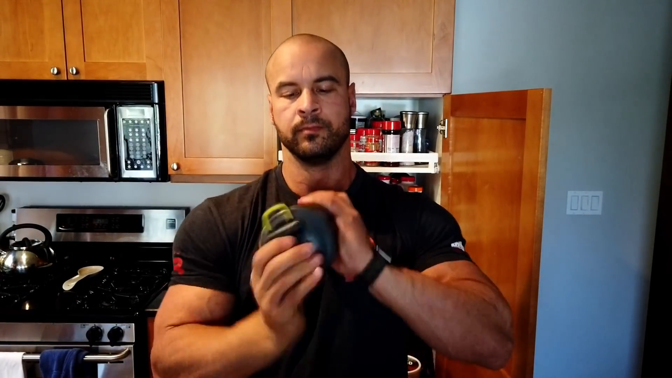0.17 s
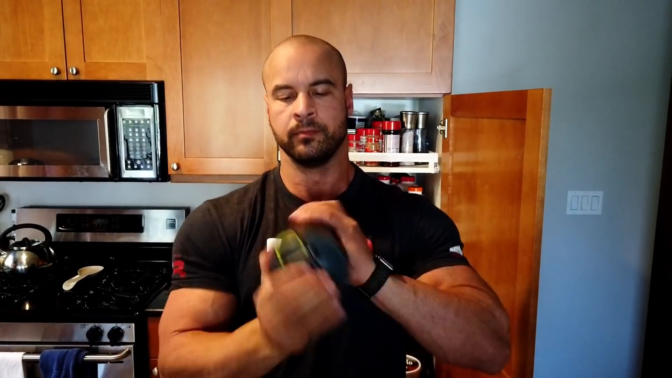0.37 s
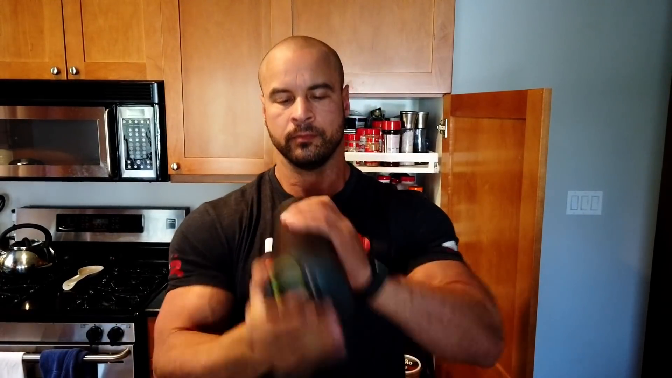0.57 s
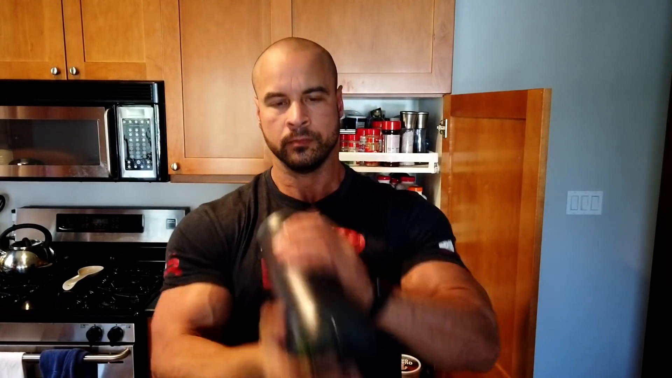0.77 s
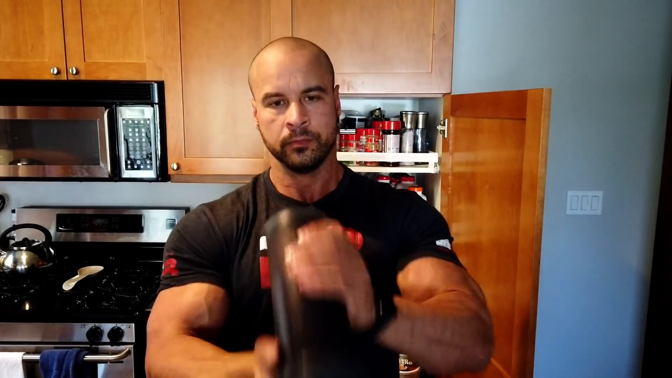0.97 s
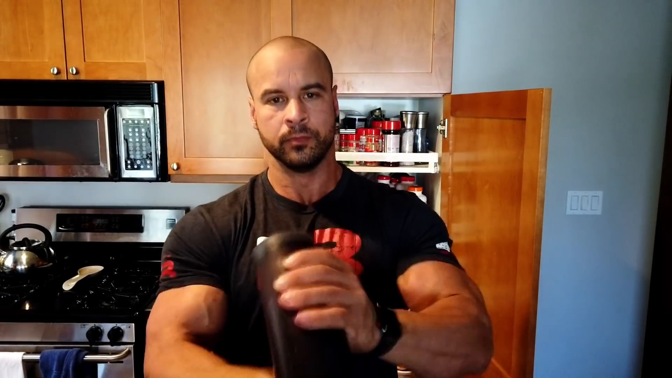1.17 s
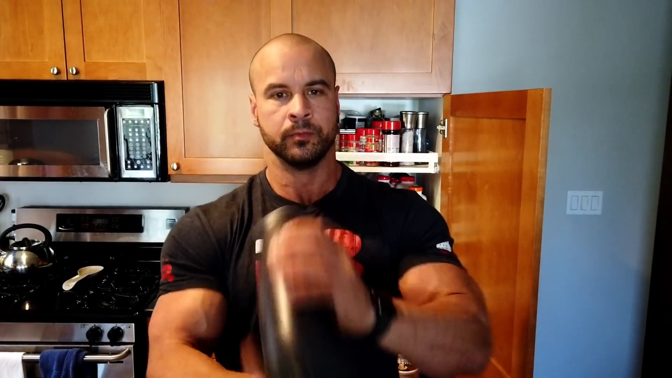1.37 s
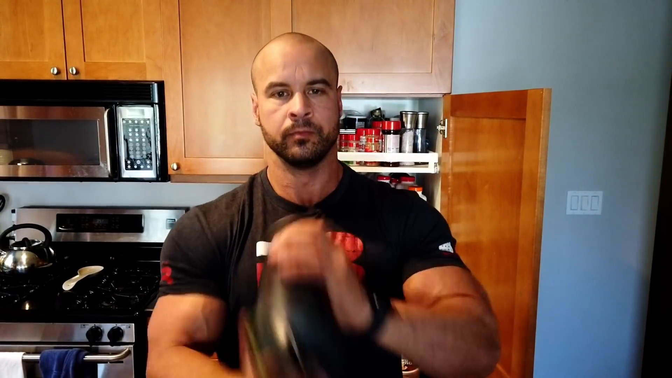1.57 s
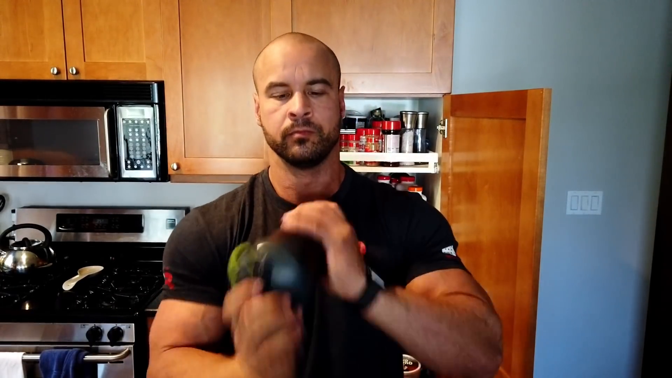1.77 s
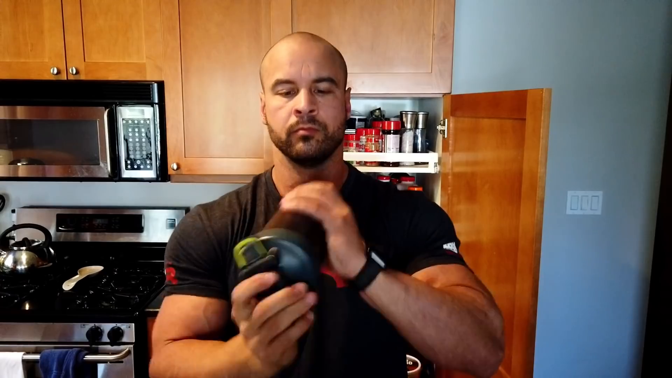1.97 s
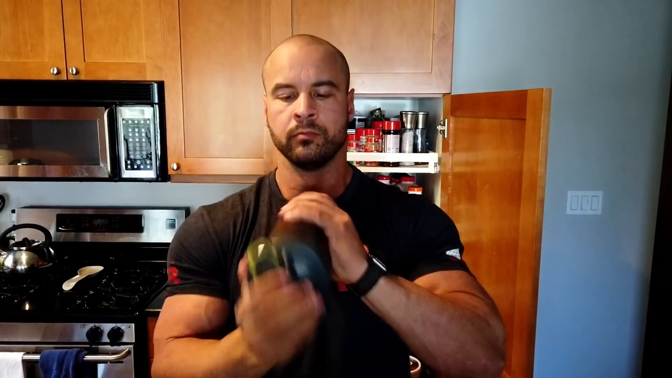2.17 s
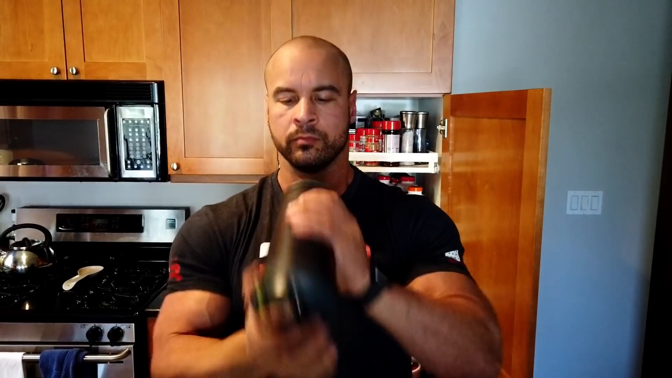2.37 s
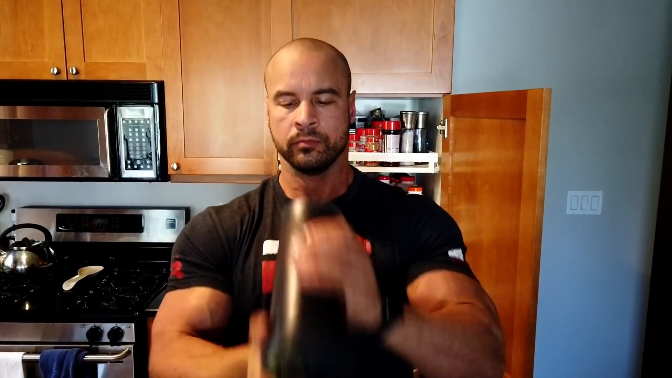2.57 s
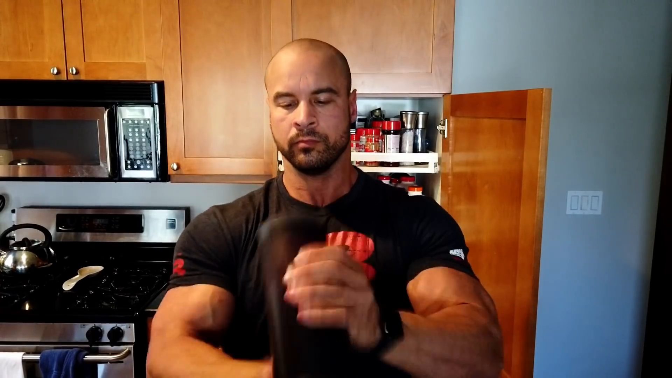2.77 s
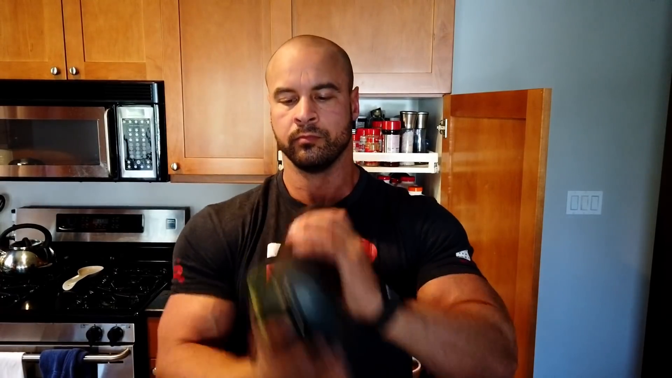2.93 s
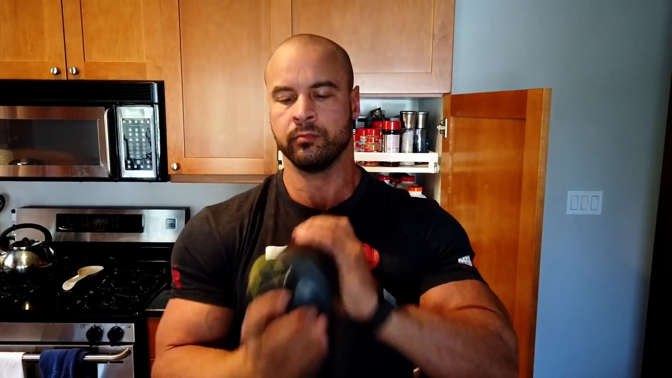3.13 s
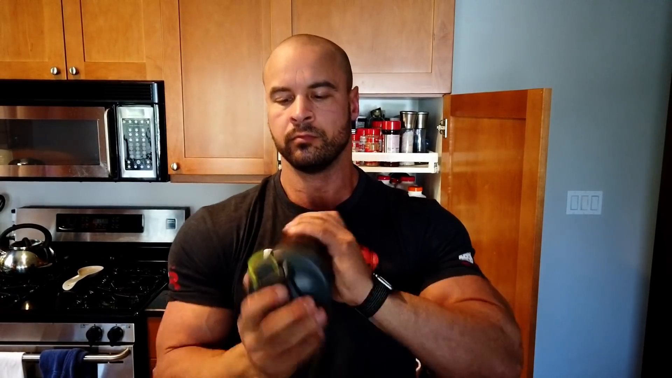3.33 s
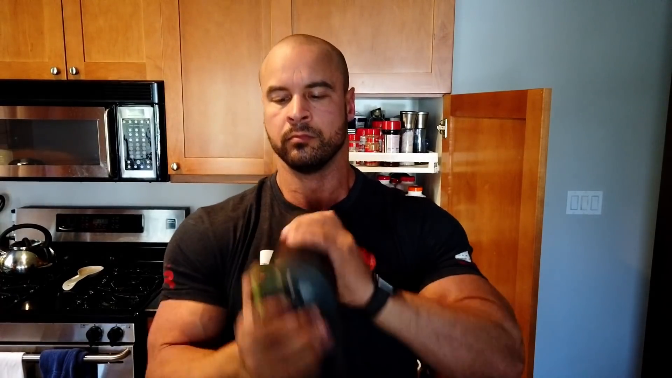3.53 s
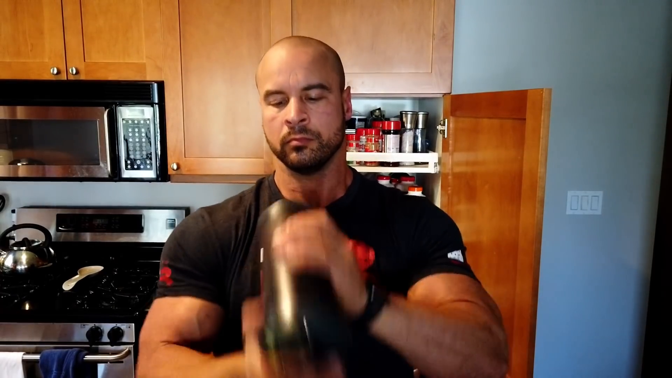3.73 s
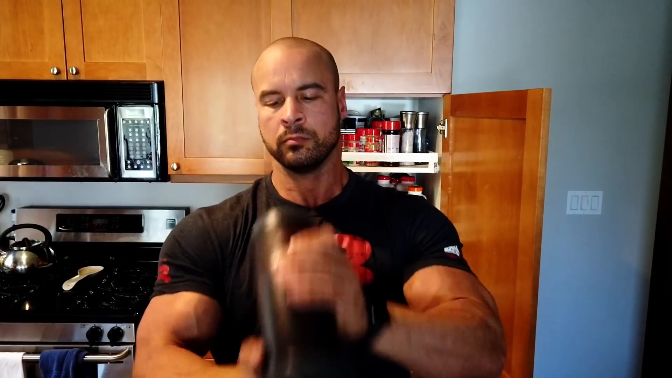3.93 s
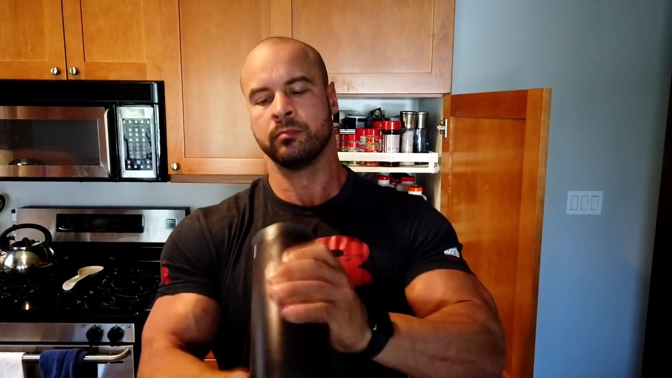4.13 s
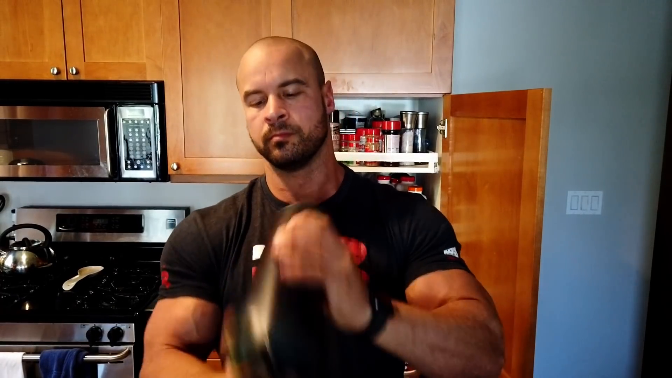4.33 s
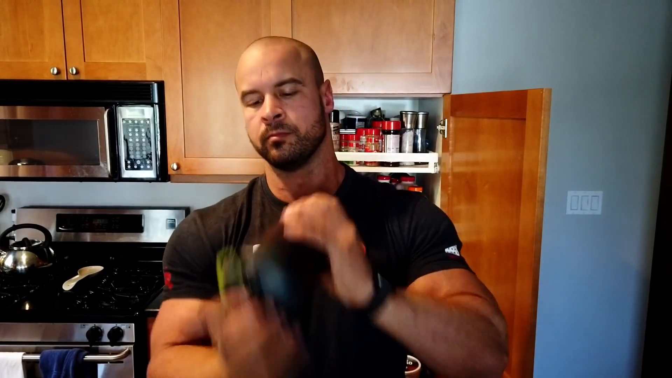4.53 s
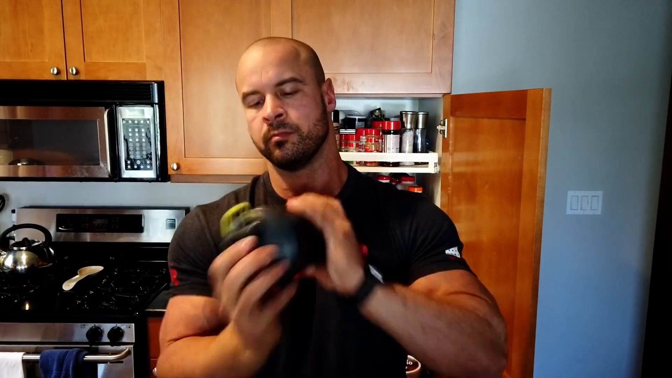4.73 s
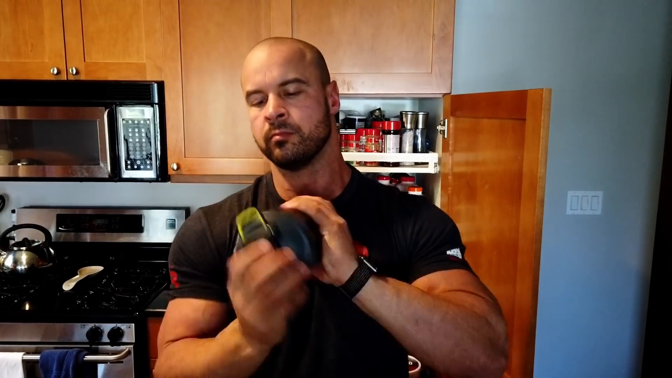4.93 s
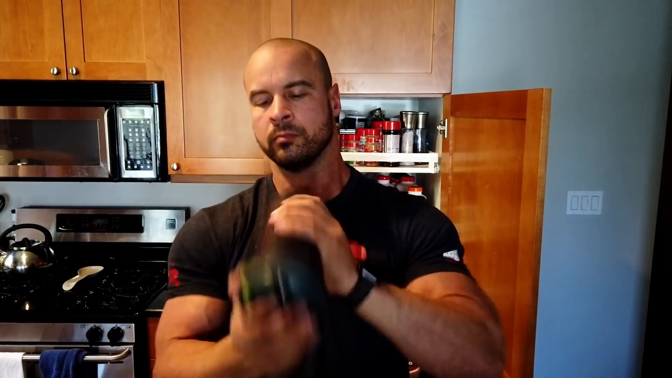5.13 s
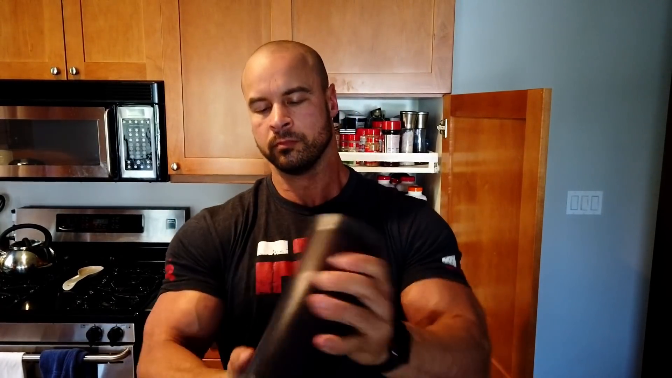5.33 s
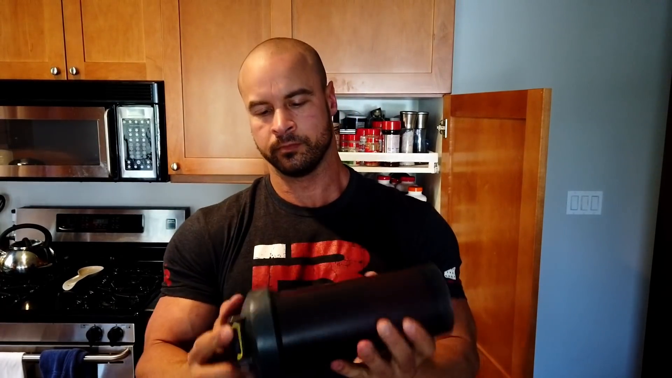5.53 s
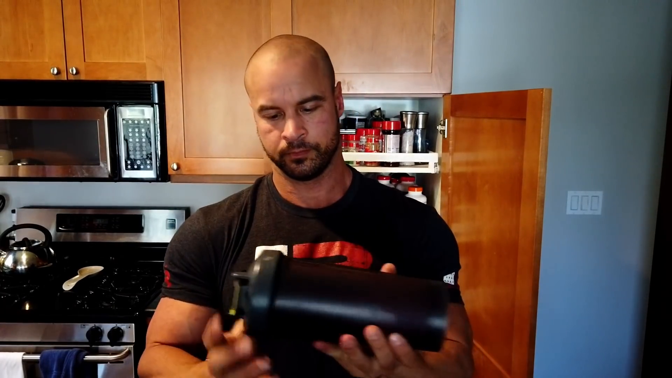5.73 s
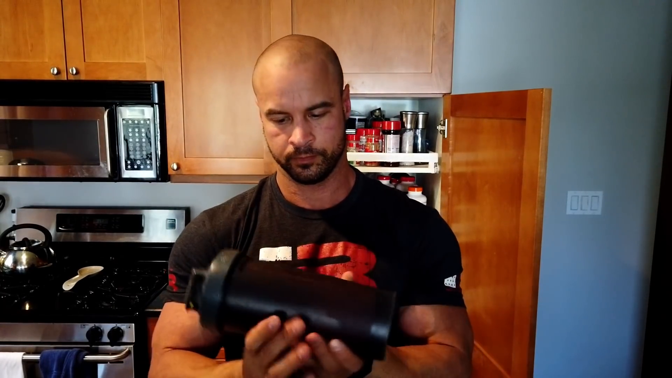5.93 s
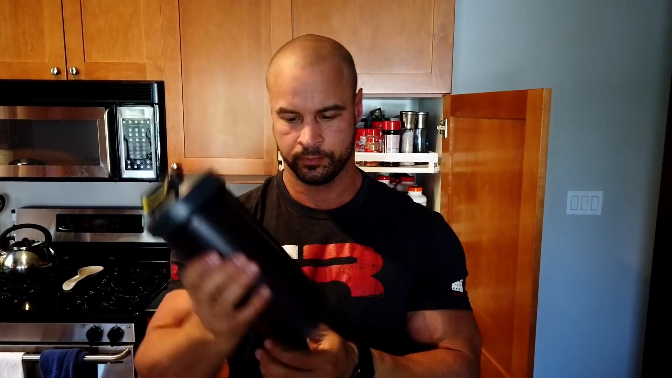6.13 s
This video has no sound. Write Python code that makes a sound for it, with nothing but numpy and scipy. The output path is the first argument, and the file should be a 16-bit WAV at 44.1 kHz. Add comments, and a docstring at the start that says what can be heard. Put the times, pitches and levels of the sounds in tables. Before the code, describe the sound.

A plastic shaker bottle shaken hard in a kitchen, loose mixer rattling and drink sloshing, then stopping and settling over a faint hum.

```python
"""A plastic shaker bottle is shaken hard, a step away in a kitchen: a loose mixer knocks on its wall.
Each knock rings the bottle's modes and snaps in the treble; the drink slaps, sloshes, bubbles and gurgles as shaped noise.
Two hollow resonances swell once per stroke, and a few blows of the drink's mass thump low.
Random echoes make the kitchen. The shaking stops and the drink settles.
A refrigerator hums as a wavering tone over the quiet of the room, which is filtered noise."""
import sys
import numpy as np
from scipy import signal
from scipy.fft import rfft, irfft, next_fast_len
from scipy.io import wavfile
from scipy.ndimage import uniform_filter1d, map_coordinates

SR = 44100
rng = np.random.default_rng(int(sys.argv[2]) if len(sys.argv) > 2 else 0)


def wav_record(signal):
    """Record a signal, one row per channel, as 16-bit PCM in the file named by sys.argv[1]."""
    frames = np.transpose(np.atleast_2d(signal))
    bounded = np.clip(frames, -1, 1)
    # unit amplitude maps onto the largest positive 16-bit level
    quanta = np.round(bounded * 32767).astype(np.int16)
    wavfile.write(sys.argv[1], SR, quanta)


N = 273271


def amp(db):
    """Decibels become a plain factor."""
    return 10 ** (np.asarray(db) / 20)


def unit(x):
    """Scale a sound to an rms of 1."""
    return x / np.sqrt(np.mean(x ** 2) + 1e-20)


def along(points, hz):
    """Read a table of (f/Hz, value) on a log frequency axis."""
    f, value = np.transpose(points)
    return np.interp(np.log(hz + 1), np.log(f + 1), value)


def wobble(rate):
    """A smooth random curve with this many random points a second."""
    points = rng.standard_normal(int(N * rate / SR) + 4)
    return map_coordinates(points, [np.arange(N) * rate / SR])


def filtered(x, response):
    """Weigh every frequency of a sound by a response."""
    m = next_fast_len(N + SR // 5)
    spectrum = rfft(x, m) * response(np.fft.rfftfreq(m, 1 / SR))
    return irfft(spectrum, m)[..., :N]


def ports(mid, side, alike):
    """Mix two unrelated signals to a left and right as alike as the table says."""
    def shares(hz):
        turn = np.arccos(np.clip(along(alike, hz), -1, 1)) / 2
        return np.array([np.cos(turn), np.sin(turn)])
    mid, side = filtered(np.array([mid, side]), shares)
    return np.array([mid + side, mid - side])


def swells(s, db, rise_s, t60_s):
    """Summed power of swells that rise quickly and die away."""
    step = 64  # samples; the power is worked out coarsely, then joined up
    t = np.maximum(np.arange(0, N + 2 * step, step) / SR - s[:, None], 0)
    shape = np.exp(-np.log(1000) * t / t60_s) * (1 - np.exp(-t / rise_s))
    power = amp(db) ** 2 @ shape ** 2
    return np.interp(np.arange(N), step * np.arange(len(power)), power)


# colour of the room noise: f/Hz, relative level per Hz/dB
ROOM_COLOUR = [(13, -52), (22, -2.5), (44, -13.5), (85, -19), (152, -19), (230, -29), (540, -26.5),
               (771, -29), (2670, -36.5), (6620, -48), (12500, -48), (13500, -54), (17000, -73.5)]
# how alike left and right are in the room noise: f/Hz, likeness (1 = the same)
ROOM_ALIKE = [(60, 0.95), (240, 0.99), (950, 0.59), (3770, 0.38), (15000, 0.11)]


def quiet():
    """The room's rumble and hiss: wide noise whose level drifts a little."""
    noise = rng.standard_normal((2, N))
    mid, side = filtered(noise, lambda hz: amp(along(ROOM_COLOUR, hz)))
    drift_db = 1.8 * wobble(11) + 1.1 * wobble(4)
    return amp(-68.5 + drift_db) * unit(ports(mid, side, ROOM_ALIKE))


def refrigerator():
    """A hum at twice the mains frequency, wavering in phase and level."""
    hum_hz, hum_db = 120, -70.5  # rms level before the waver
    phase = 2 * np.pi * hum_hz * np.arange(N) / SR + 0.3 * wobble(12)
    waver_db = 1.7 * wobble(12) + .9 * wobble(4)
    return np.sqrt(2) * amp(hum_db + waver_db) * np.sin(phase)


# how long the kitchen's answer lasts: f/Hz, t60/s (time to fall 60 dB)
KITCHEN_T60 = [(200, 0.46), (2000, 0.14), (10000, 0.24)]
# how alike left and right are in the kitchen's answer and the splashes: f/Hz, likeness
SPLASH_ALIKE = [(60, 0.89), (120, 1.0), (550, 1), (950, 0.94), (1650, 0.95), (2860, 0.68), (4970, 0.17),
                (8640, 0.21), (15000, 0.58)]


def kitchen(x):
    """Counters and cupboards answer within milliseconds; each frequency dies at its own speed."""
    wet, step = np.zeros((2, N + SR)), SR // 3
    # a fresh random echo tail is drawn three times a second
    for at in range(0, N, step):
        hz, t, z = signal.stft(rng.standard_normal((2, step)), SR, nperseg=256)
        fade = amp(-60 * t / along(KITCHEN_T60, hz)[:, None])
        tail = signal.istft(z * fade, SR, nperseg=256)[1]
        tail = tail / np.linalg.norm(tail[0])
        answer = signal.fftconvolve(x[None, at:at + step], tail, axes=1)
        start = at + 100  # samples of delay
        wet[:, start:start + answer.shape[1]] += answer
    return ports(*wet[:, :N], SPLASH_ALIKE)


# churning between the strokes, dying when the arms stop: t/s, relative level/dB
CHURN_LEVEL = [(0, -49), (.6, -50.5), (1.2, -53), (2.44, -53.5), (2.55, -54), (2.66, -52), (3.12, -51),
               (3.24, -53.5), (3.4, -47.5), (3.7, -45.5), (4.18, -50.5), (4.4, -47.5), (5.0, -51.5),
               (5.47, -44), (5.67, -73.5), (5.85, -100.5)]


def churning():
    """The churning's level in dB at every sample, silent after the last row."""
    s, db = np.transpose(CHURN_LEVEL)
    return np.interp(np.arange(N) / SR, s, db, right=-120)


# the drink's mass hits an end of the bottle; a faster blow is higher and shorter:
# t/s, relative level/dB, f/Hz
MASS_BLOWS = [(0.421, -42.5, 180), (1.099, -53, 70.4), (1.547, -59, 80), (2.912, -55, 71),
              (3.383, -58.5, 55), (4.054, -56, 50), (4.266, -61, 70), (5.211, -62, 80)]
# colour of the arms' rumble: f/Hz, relative level per Hz/dB
RUMBLE_COLOUR = [(15, -36.5), (28, -9.5), (47, -0.5), (75, -18), (110, -7.5), (220, -12.5), (300, -57.5)]
# strokes of the arms, also played by hollow_rings() and surge(): landing in the lid t/s, landing level/dB,
# depth level/dB (extra for the gurgle), lead t/s of leaving the base, leaving level/dB (levels relative)
ARM_STROKES = [(-0.03, -35.5, -1, 0.059, -50), (0.18, -36.5, -5, 0.067, -41),
               (0.403, -39.5, -1, 0.085, -41.5), (0.633, -40, -4.5, 0.076, -45.5),
               (0.869, -41.5, 0, 0.083, -45), (1.085, -40.5, 1, 0.086, -47.5),
               (1.322, -40, 1, 0.064, -39.5), (1.534, -38, 2, 0.092, -44), (1.751, -41.5, 4, 0.063, -41),
               (1.974, -39, 0.5, 0.074, -40.5), (2.213, -43, 6, 0.075, -44), (2.443, -44, 8.5, 0.07, -44),
               (2.667, -39.5, -8, 0.076, -43), (2.898, -41, 6.5, 0.077, -42),
               (3.133, -44.5, 12, 0.073, -44.5), (3.366, -41, 5, 0.062, -45.5), (3.589, -44, 4, 0.074, -52),
               (3.823, -39.5, -1, 0.084, -45), (4.048, -42, 9, 0.053, -46.5), (4.244, -39, -5, 0.044, -54),
               (4.512, -41, -7, 0.11, -45.5), (4.745, -42, -6, 0.092, -45), (4.961, -40.5, 1, 0.072, -44),
               (5.2, -41, 2.5, 0.089, -40)]


def thumps():
    """Soft low pushes with their recoil, over the rumble of the moving arms."""
    out, t = np.zeros(N + SR), np.arange(SR // 5) / SR
    for s, db, hz in MASS_BLOWS:
        turns = hz * t
        push = turns / 0.045 * np.exp(1 - turns / 0.13)
        out[round(s * SR):][:len(t)] += amp(db) * push * np.sin(2 * np.pi * turns)
    rumble = unit(filtered(rng.standard_normal(N), lambda hz: amp(along(RUMBLE_COLOUR, hz))))
    s = np.transpose(ARM_STROKES)[0]
    heave_db = -62.5 + rng.normal(0, 3, len(s))
    heave = swells(s - .02, heave_db, rise_s=0.01, t60_s=0.57)  # starts 20 ms before the landing
    rest = amp(churning() - 27.5) ** 2
    return out[:N] + np.sqrt(heave + rest) * rumble


def hollow_rings():
    """Noise in two resonances swells once per stroke: the higher from the landing, the lower from 0.34 s before leaving."""
    s, land_db, _, before_s, leave_db = np.transpose(ARM_STROKES)
    # f/Hz, width/Hz, level/dB over the stroke, lead t/s
    higher, lower = (2441.5, 152, -7, 0), (1790.5, 171, -3.5, 0.34)
    out = 0
    for (hz, width_hz, db, lead_s), at, level_db in ((higher, s, land_db), (lower, s - before_s, leave_db)):
        lumpy = amp(4.5 * wobble(60)) * rng.standard_normal(N)
        tone = unit(filtered(lumpy, lambda f: 1j * f * width_hz / (hz * hz - f * f + 1j * f * width_hz)))
        out = out + tone * np.sqrt(swells(at - lead_s, level_db + db, rise_s=0.02, t60_s=0.38))
    return out


def surge(stroke_db, knock_db, rest_db, swing, rise_s, t60_s, knock_t60_s, per_depth=0):
    """A layer's gain: strokes throw the drink off the base and into the lid, knocks splash it, churning fills the rest."""
    # the dB arguments are the layer's level over each cause
    s, land_db, depth_db, before_s, leave_db = np.transpose(ARM_STROKES)
    front_s = 0.0082  # the front of the drink comes this long before its mass
    starts = np.r_[s, s - before_s] - front_s
    levels = np.r_[land_db + per_depth * depth_db, leave_db] + stroke_db
    thrown = swells(starts, levels, rise_s, t60_s)
    knock_s, level_db = np.transpose(MIXER_KNOCKS + DRINK_SLAPS)[:2]
    splashed = swells(knock_s, level_db + knock_db, 0.0025, knock_t60_s)
    mean_db = -52.5  # each layer swings about this churning level
    churn_db = mean_db + swing * (churning() - mean_db)
    return np.sqrt(thrown + splashed + amp(churn_db + rest_db) ** 2)


def spatter(spectrum, per_s, scatter_db, grain_s, wash):
    """Stereo noise of rms 1, broken into splashes of uneven size over a smooth wash."""
    drops = (rng.random(N) < per_s / SR) * amp(scatter_db * rng.uniform(-0.15, 1, N))
    fade = np.exp(-np.arange(SR // 40) / (grain_s * SR))
    bursts = unit(signal.fftconvolve(drops, fade)[:N])
    z = signal.stft((bursts + wash) * rng.standard_normal((2, N)), nperseg=512)[2]
    # random patches in time and frequency give each splash its own colour
    field = uniform_filter1d(rng.standard_normal(z.shape[1:]), size=2, axis=0)
    field = uniform_filter1d(field, size=6, axis=1)
    patchy = signal.istft(z * amp(2.73 * unit(field)), nperseg=512)[1][:, :N]
    mid, side = filtered(patchy, lambda hz: amp(along(spectrum, hz)))
    return unit(ports(mid, side, SPLASH_ALIKE))


def bubbles():
    """Trapped air pops in the froth: short rising pips, a few louder, together at rms 1."""
    per_s, centre_hz, spread = 300, 2310, 0.25  # spread of the log pitch
    cycles, rise, scatter_db = 9.1, 0.12, 2.5  # rise: share of pitch gained over one life
    when, pitch, size = rng.random((3, int(per_s * N / SR), 1))
    start = (when * N).astype(int)
    hz = np.clip(centre_hz * np.exp(spread * np.log(pitch / (1 - pitch)) / 2), 1100, 6000)
    froth = np.exp(.17 * wobble(11))  # coarse and fine froth come and go
    hz = hz * froth[start]
    k = np.arange(SR // 90)
    life = hz * k / SR / cycles
    pip = np.sin(2 * np.pi * cycles * life * (1 + rise * life / 2)) * life * np.exp(-4 * life)
    pip = pip * amp(-scatter_db * np.log(np.maximum(size, .03)))
    pops = np.bincount((start + k).ravel(), pip.ravel())[:N]
    return unit(np.pad(pops, (0, N - len(pops))))


# colours of slaps on the wall, fine spray and low gurgles: f/Hz, relative level per Hz/dB
SLOSH_COLOUR = [(470, -17.5), (800, -6), (1110, -0.5), (1380, 4.5), (1520, 1), (1800, 4), (2560, 5.5),
                (6000, -8), (7800, -46), (13200, -120)]
SPRAY_COLOUR = [(2060, -24.5), (3500, -4), (4630, -9), (7660, -8), (9140, -12.5), (10100, -9.5),
                (11200, -11), (15200, -21), (15900, -50)]  # also colours the snap of a knock
GURGLE_COLOUR = [(120, -40.5), (200, -14.5), (264, -20.5), (314, -5.5), (446, -7), (567, -3.5), (715, -4.5),
                 (1200, -8), (1560, -27.5), (2640, -120)]


def drink():
    """Three sizes of splash: sloshing, fine spray and low gurgles; bubbles swell with the slosh."""
    slosh = surge(stroke_db=-1.5, knock_db=-22.5, rest_db=-1.0, swing=0.67,
                  rise_s=0.01, t60_s=0.45, knock_t60_s=0.096)
    spray = surge(stroke_db=-5.5, knock_db=-35.5, rest_db=-10.5, swing=0.92,
                  rise_s=0.0086, t60_s=0.5, knock_t60_s=0.2)
    gurgle = surge(stroke_db=-4.5, knock_db=-30.0, rest_db=-10.5, swing=0.77,
                   rise_s=0.017, t60_s=0.29, knock_t60_s=0.049, per_depth=0.65)
    return (slosh * spatter(SLOSH_COLOUR, per_s=510, scatter_db=5, grain_s=0.0035, wash=0.8)
            + slosh * amp(-2.5) * bubbles()
            + spray * spatter(SPRAY_COLOUR, per_s=260, scatter_db=9, grain_s=0.0015, wash=2.2)
            + gurgle * spatter(GURGLE_COLOUR, per_s=200, scatter_db=-8.0, grain_s=0.0022, wash=6.3))


def ring(modes, t, weight_db=0):
    """Modes set ringing at new strengths, detuned by the drink that loads the wall."""
    hz, db, t60 = np.transpose(modes)[:, :, None]
    level = db + weight_db + rng.normal(0, 2.5, hz.shape)
    hz = hz * (1 + rng.normal(0, .025, hz.shape))
    phase = rng.normal(0, .9, hz.shape)
    return np.sum(amp(level - 60 * t / t60) * np.sin(2 * np.pi * hz * t + phase), axis=0)


# knocks of the mixer on the wall: t/s, relative level/dB, ring centre f/Hz,
# snap level/dB, snap brightness level/dB (treble over the rest), body level/dB
MIXER_KNOCKS = [(0.1842, -27.5, 2020, -8, 3, -25), (0.242, -19, 1910, -9, 0.5, -42),
                (0.3176, -27.5, 1570, -16.5, -6, -18), (0.4041, -16.5, 3200, -17, 9, -8),
                (0.4552, -16.5, 1810, -14, -4, -38), (0.5724, -31.5, 1710, -23, -2, 6),
                (0.6338, -22, 2350, -9.5, -1.5, -29), (0.694, -16, 2200, -14.5, -8.5, -39.5),
                (.7802, -32.5, 2690, -13.5, 10.5, 3.5), (0.811, -30, 1400, -28, -4.5, -16),
                (0.862, -26, 2500, -19, -1, -30), (0.869, -21, 2520, -14.5, 6, -38),
                (.9125, -30, 2020, -19, -6, -25), (.9699, -28.5, 2700, -16, 4, -27),
                (0.9986, -30.5, 2570, -11, 4, -23), (1.145, -33.5, 2040, -10, 0, 7),
                (1.2266, -27, 2010, -11, -4, -20), (1.2648, -16, 3120, -31, -1, -30),
                (1.3214, -19, 3030, -11, 1, -36), (1.3513, -11.5, 2000, -17.5, 4, -47),
                (1.424, -23.5, 3020, -13.5, 1, -31), (1.464, -29, 2640, -17, 4, -25),
                (1.5326, -25, 2380, -10.5, 10, -23), (1.5545, -34.5, 2400, -4.5, 11, -25),
                (1.5991, -31.5, 1940, -4, 0.5, -27), (1.709, -23.5, 1510, -24.5, -10, -12),
                (1.7532, -16, 2800, -16, 6, -28), (1.813, -16.5, 1890, -14.5, -6, -41),
                (1.8265, -23, 2400, -12.5, -6, -30), (1.8764, -27, 2400, -14, 1, -24),
                (1.9017, -39, 2420, -6, 2, -14), (1.9698, -29, 2400, -6, -4, -36),
                (1.9884, -22, 2420, -24, 2, -32), (2.037, -28, 2160, -9, -1.5, -39),
                (2.116, -35.5, 1770, -1, 9, -34), (2.158, -26, 1950, -24, -18, -4),
                (2.1982, -27, 2500, -20, -5, -27), (2.216, -20.5, 2300, -20.5, -4, -7),
                (2.2735, -19.5, 2470, -37, 1.5, -37), (2.401, -25, 1270, -25, 0, -1.5),
                (2.514, -33, 2010, -28, -4, -19), (2.571, -32, 2900, -18, -5, -24),
                (2.6147, -26, 1840, -17, 8, -7), (2.6714, -20.5, 2460, -33, -8, -15.5),
                (2.7103, -39, 2400, -9, 1, -24.5), (2.724, -36, 3200, -7, 2, -25),
                (2.7333, -12.5, 2470, -15.5, 12, -21), (2.7754, -24, 2300, -17, 5, -27),
                (2.803, -30.5, 2200, -7, 4.5, -27), (2.8282, -29.5, 1800, -11, 8, -27),
                (2.844, -23.5, 2000, -21, -5.5, -23), (2.9013, -22.5, 2950, -18, -3.5, -28),
                (2.9715, -21, 3360, -17, 1.5, -32), (3.0121, -29, 2670, -11.5, -3, -31),
                (3.048, -30.5, 2470, -9.5, -9, -29), (3.0704, -23, 2360, -18, 5, -10),
                (3.133, -24, 2600, -23, -7, -30), (3.1364, -13.5, 2870, -18.5, 0, -16.5),
                (3.3704, -17.5, 2560, -14, 1.5, -3), (3.4314, -14, 3060, -19, -10, -25),
                (3.4936, -30.5, 2400, -16, 7, -25), (3.522, -36, 2400, -8.5, 7, -25),
                (3.6658, -25, 2430, -33, -7, -7), (3.697, -24.5, 2320, -19, -4, -28),
                (3.707, -22, 2270, -15.5, 10, -26), (3.735, -37, 2300, -12, 11, -28),
                (3.8291, -16.5, 2870, -15, -3, -20), (3.8789, -22.5, 1920, -10, 3, -35),
                (3.8916, -21, 2110, -20, -8.5, -28), (3.9551, -30, 2670, -8, -4, -37),
                (3.9783, -27, 1890, -16.5, 8, -4.5), (4.0503, -25, 2540, -24, 0, -9.5),
                (4.0598, -28.5, 2400, -8.5, -1, -20), (4.248, -20.5, 2230, -19.5, 0, -0.5),
                (4.287, -27, 2300, -18.5, -4.5, -29), (4.3035, -33, 3050, 2, 7, -13),
                (4.3355, -7.5, 2360, -23.5, 6, -40), (4.4258, -26, 1950, -11, 6, -33),
                (4.469, -24, 2870, -41, 0, -18), (4.5167, -19, 2330, -14.5, -4, -4.5),
                (4.5798, -18.5, 2730, -13.5, -8, -16.5), (4.6208, -19, 2520, -12.5, 4.5, -36),
                (4.6686, -33, 2500, -8.5, 4, -25), (4.7521, -20, 2450, -13, -5, -37),
                (4.8071, -22, 2730, -18, 8, -17), (4.8435, -23.5, 3330, -10, -2, -36),
                (4.8958, -27, 2530, -12, 7.5, -14), (4.931, -35, 1555, -28, -5, -25),
                (5.0267, -12, 2700, -18, -2, -10.5), (5.039, -31, 2600, -3.5, -1, -27),
                (5.0844, -23, 2600, -17.5, 6, -28.5), (5.0983, -33, 2500, -9.5, -5, -28),
                (5.132, -20.5, 1040, -19.5, -3, -33), (5.2006, -28, 1300, -11, -5, -27),
                (5.2703, -13, 2320, -16.5, 0, -22), (5.288, -33.5, 2600, -1.5, 6.5, -35),
                (5.3918, -25.5, 1660, -30.5, -0.5, -4), (5.513, -36.5, 3040, -6.5, -4, -32),
                (5.5317, -35.5, 3310, -7, 10, 0), (5.62, -36.5, 1270, -22, 0, -28),
                (5.6572, -36.5, 1850, -24.5, -17, -34), (5.869, -51.5, 2760, -25, -15, -15),
                (6.0487, -53, 2700, -29, -5, -1), (6.132, -52.5, 3200, -23, 5, -16)]
# slaps of the drink on the wall, spread over some milliseconds: same columns
DRINK_SLAPS = [(0.095, -27, 1950, -17, -13, -32), (1.027, -28, 2370, -17.5, 8, -38),
               (1.086, -24.5, 2060, -13, -3, 0.5), (2.248, -22.5, 2190, -25, 1, -25),
               (2.362, -28.5, 1870, -10.5, 1.5, -12), (2.44, -19, 2540, -16, -2, -13),
               (3.587, -17, 2260, -12.5, -0.5, -24), (4.866, -24, 2800, -13.5, -2.5, -34),
               (4.961, -20.5, 2360, -12.5, -10.5, -28)]
# ringing of the bottle's wall, before detuning: f/Hz, relative level/dB, t60/s
WALL_MODES = [(1150, 3.5, 0.02), (1280, 22, 0.014), (1390, 14, 0.041), (1804, 7, 0.064), (2273, 8, 0.067),
              (2558, 21, 0.022), (2830, 5.5, 0.067), (2890, 17.5, 0.02), (3056, 20.5, 0.02),
              (3260, 2.5, 0.041), (3900, -1.5, 0.0069)]
# hollow ringing of the air and shell, before detuning: f/Hz, relative level/dB, t60/s
BODY_MODES = [(303, -0.5, 0.043), (566, -3.5, 0.049), (657, 4, 0.018), (812, -1.5, 0.043)]
# how alike left and right are in the snap: f/Hz, likeness
SNAP_LIKENESS = [(4500, 0.98), (6500, 0.75), (9000, .05), (12000, 0.38)]


def knocks():
    """A short blow rings the wall modes near its centre, snaps and sounds the body; a slap does so with a smeared push."""
    wall, snap, t = np.zeros(N + SR), np.zeros((2, 2, N + SR)), np.arange(SR // 15) / SR
    slap_length = int(.008 * SR)  # a slap keeps pushing for 8 ms
    contacts = [(row, 1) for row in MIXER_KNOCKS] + [(row, slap_length) for row in DRINK_SLAPS]
    for (s, db, hz, snap_db, bright_db, body_db), length in contacts:
        push = 1 + rng.standard_normal(length) * (length > 1)
        push = push * np.hanning(length + 2)[1:-1]
        push = push / np.linalg.norm(push)
        first = round((s + .0008) * SR)
        place = slice(first, first + len(t))

        # the nearer a mode is to the ring centre, the stronger it rings
        octaves = np.log2(np.array(WALL_MODES)[:, :1] / hz)
        tone = ring(WALL_MODES, t, -60 * octaves ** 2) * (1 - np.exp(-t / 0.000083))
        blow = np.sin(2 * np.pi * hz * t) * hz * t * np.exp(-hz * t / 0.84)  # dies within a few cycles
        tone = tone / np.abs(tone).max() + amp(-1) * blow / np.abs(blow).max()
        tone = signal.fftconvolve(tone, push)[:len(t)]
        wall[place] += amp(db - 6.0) * tone / np.abs(tone).max()
        wall[place] += amp(db + body_db - 16.5) * ring(BODY_MODES, t) * (1 - np.exp(-t / 0.0015))

        # a sharp crack with a weaker, longer tail
        fade = amp(-60 * t / 0.0042) + 0.18 * amp(-60 * t / 0.041)
        crack = fade * rng.standard_normal((2, len(t)))
        crack = np.array([signal.fftconvolve(c, push)[:len(t)] for c in crack])
        crack = crack / np.linalg.norm(crack, axis=1, keepdims=True)
        tilt = amp([-bright_db / 2, bright_db / 2])[:, None, None]  # lower and upper part of the snap
        snap[..., place] += amp(db + snap_db + 31.5) * tilt * crack

    def snap_colour(hz):
        low = 1 / (1 + (hz / 7500) ** 6)  # the brightness pivots at 7500 Hz
        return amp(along(SPRAY_COLOUR, hz)) * np.array([low, 1 - low])[:, None]
    # a small bottle radiates little bass
    shell = filtered(wall[:N], lambda hz: hz ** 2 / (hz ** 2 + 300 ** 2))
    mid, side = filtered(snap[..., :N], snap_colour).sum(axis=0)
    return shell + ports(mid, side, SNAP_LIKENESS)


def scene():
    """Bottle, room and background together; only the knocks and slaps set the kitchen echoing."""
    hits = knocks()
    echoes = amp(-5.0) * kitchen(hits.mean(axis=0))
    return hits + echoes + drink() + hollow_rings() + thumps() + refrigerator() + quiet()


def record(dry):
    """Nothing from 16800 Hz upward is kept."""
    return filtered(dry, lambda hz: hz < 16800)


dry = scene()
out = record(dry)
wav_record(out)
```